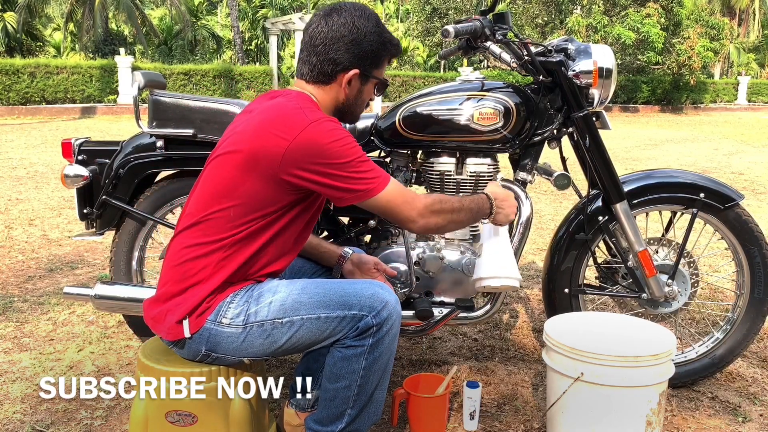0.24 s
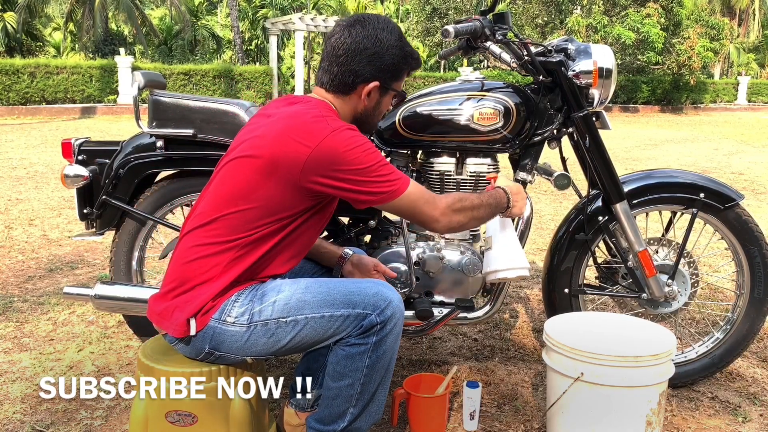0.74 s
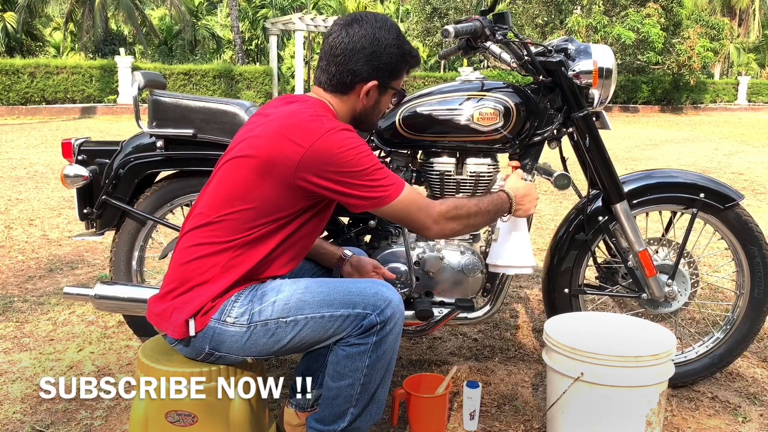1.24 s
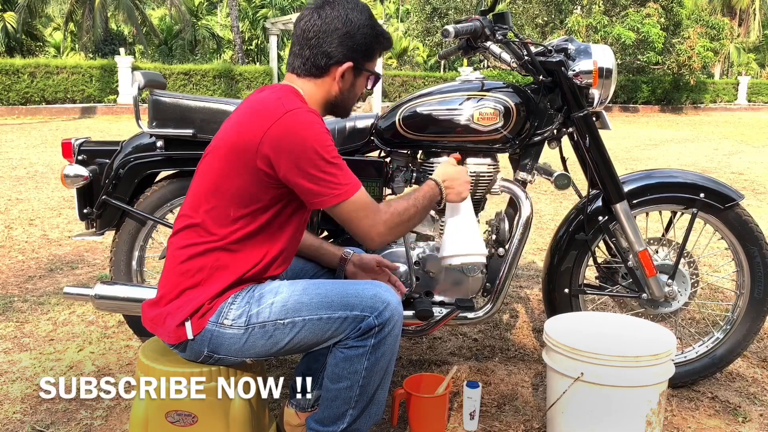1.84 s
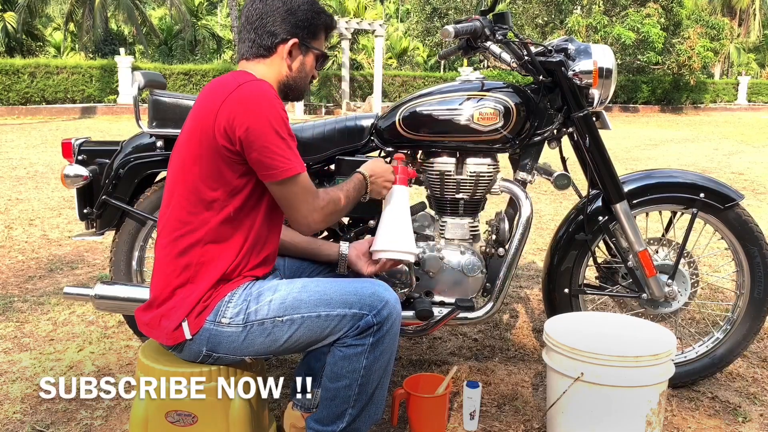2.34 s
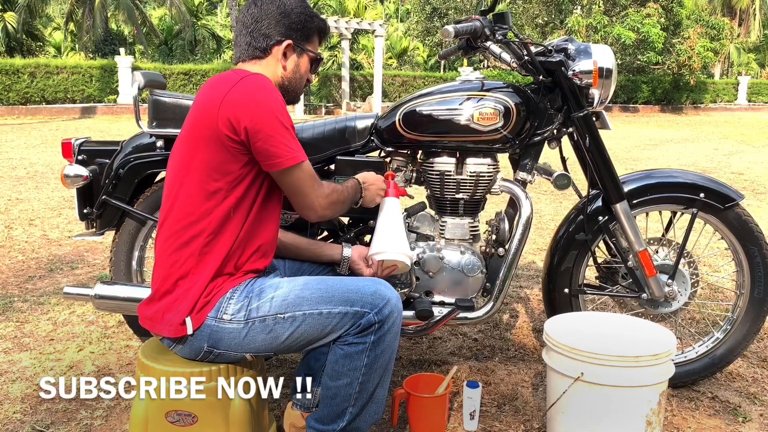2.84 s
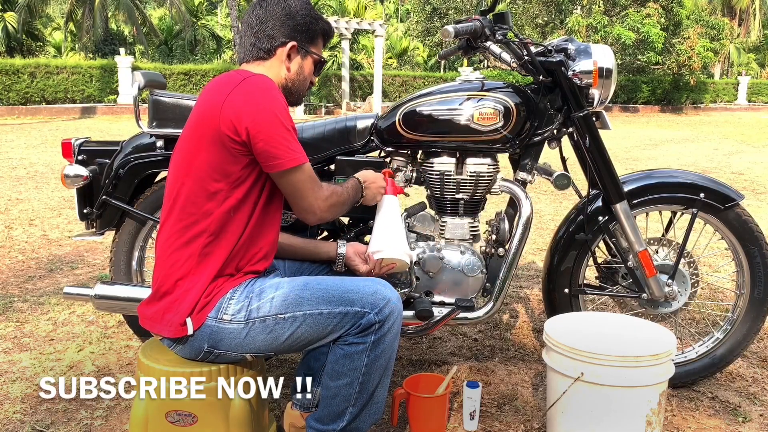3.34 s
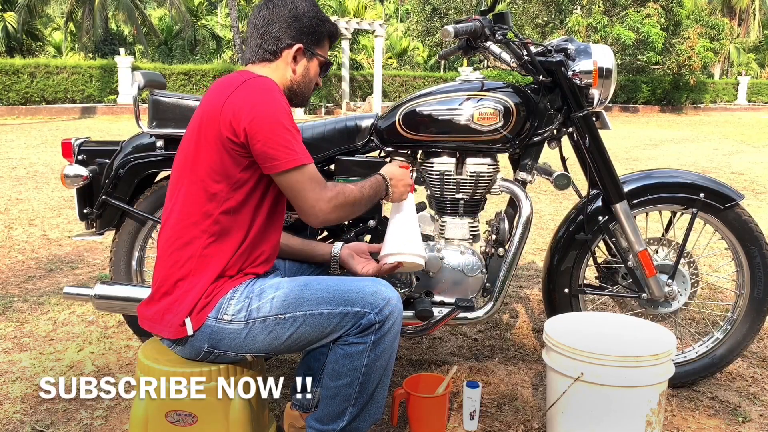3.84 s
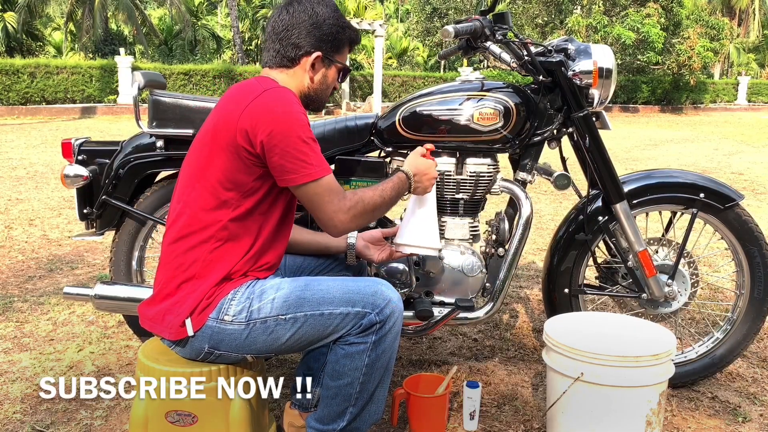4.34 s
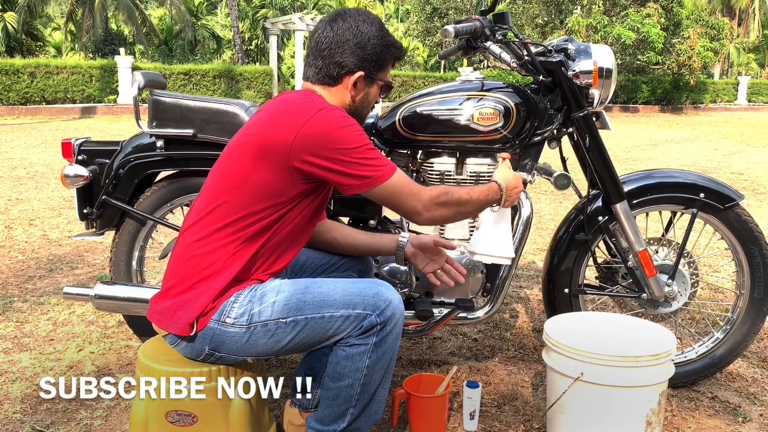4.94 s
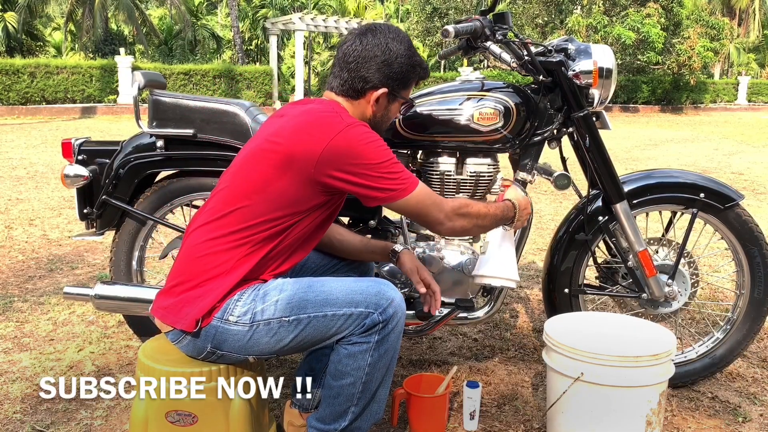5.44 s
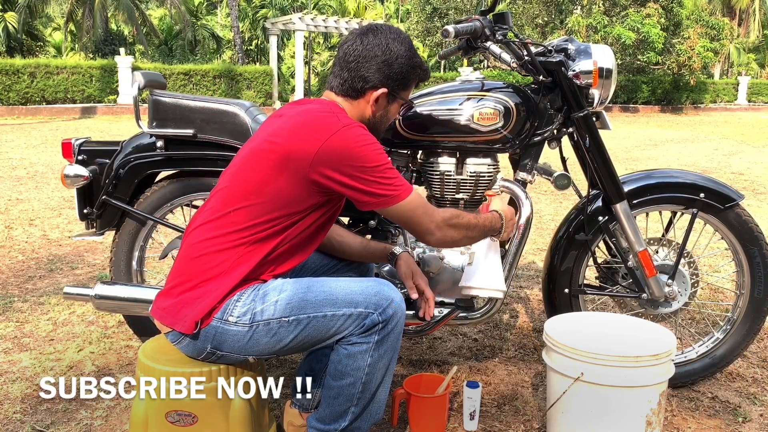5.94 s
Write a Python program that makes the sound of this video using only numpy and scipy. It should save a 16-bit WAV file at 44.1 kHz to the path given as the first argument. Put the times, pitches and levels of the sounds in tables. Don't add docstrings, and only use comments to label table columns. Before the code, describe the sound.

A hand-pump sprayer wets a motorcycle engine a few metres from a stereo outdoor microphone. Its thin, bright hiss runs throughout, mist pattering on metal, its hollow tone sliding as the hand moves. Quick pressure dips and tiny spits break the flow. Just after four seconds, low wind thumps hit the microphone and plastic lever taps click. Distant traffic and leaves stay faint behind.

```python
import sys
import numpy as np
from scipy import signal
from scipy.fft import rfft, irfft
from scipy.io import wavfile
from scipy.ndimage import uniform_filter1d, map_coordinates

SR = 44100
rng = np.random.default_rng(int(sys.argv[2]) if len(sys.argv) > 2 else 0)


def persist_wave(psi):
    counts = np.round(np.clip(psi, -1, 1) * 32767).astype(np.int16)
    wavfile.write(sys.argv[1], SR, np.atleast_2d(counts).T)


def decibels_to_gain(level_db):
    exponent = np.asarray(level_db, float) / 20
    return 10 ** exponent


N = 272538

# frequency in Hz, level in dB per Hz.
GARDEN_SPECTRUM = [(25, -31), (60, -20), (100, 1.6), (200, -8.5), (350, -12), (800, -22), (3000, -11.5),
                   (16000, -39)]
# frequency in Hz, level in dB per Hz.
BUFFET_SPECTRUM = [(15, -14), (30, -14.5), (52, -3.5), (80, -4.5), (120, -25), (180, -35.5), (300, -50)]
# centre in seconds, peak in dB, half length in seconds.
PUFFS = [(1.265, -44, .05), (1.846, -50, 0.032), (2.183, -63, 0.087), (2.45, -60, 0.077),
         (2.966, -55, 0.044), (3.505, -51, 0.044), (3.933, -38, 0.038), (4.023, -23.5, 0.019),
         (4.102, -29.5, 0.027), (4.182, -31, 0.022), (4.288, -31.5, 0.057), (4.414, -27, 0.027),
         (4.474, -34.5, 0.021), (4.522, -34.5, 0.016), (4.564, -31, 0.018), (4.632, -36, 0.031),
         (4.733, -39.5, 0.038), (4.841, -37.5, 0.042), (4.919, -33.5, 0.069), (5.128, -40, 0.073),
         (5.277, -36, .022), (5.372, -32, 0.045), (5.421, -30, .018), (5.456, -25, 0.023),
         (5.615, -34, 0.055), (5.711, -36.5, 0.017), (5.81, -46, 0.056), (6.001, -49, 0.047)]
# start in seconds, peak in dB, pitch in Hz, decay by 60 dB in seconds.
LEVER_TAPS = [
    (4.079, -20, 1330, 0.0084),
    (4.327, -18.5, 2250, 0.014),
    (4.502, -32.5, 1300, 0.022),
    (4.563, -19, 2270, 0.012),
]

# frequency in Hz, likeness from 0 to 1.
PORT_LIKENESS = [(60, .9), (250, .82), (500, .68), (1000, .72), (1500, .8), (2300, .87), (3300, .76),
                 (4200, .7), (5200, .3), (6500, .72), (8500, .92), (15000, .88)]
# frequency in Hz, left over right in dB.
PORT_TILT = [(300, 0.3), (1000, -0.8), (2200, -3.5), (4000, -5.5), (5300, -8), (6500, -2.5), (7500, 0.7)]
# frequency in Hz, phase in radians by which the left leads.
PORT_LEAD = [(0, 0), (800, -.7), (2000, 0), (5000, .05), (6500, -.6), (8550, -3.14), (11000, -6.28),
             (13400, -9.42), (15750, -12.56)]

# frequency in Hz, level in dB per Hz.
HISS_SPECTRUM = [(250, -30), (420, -16), (600, -7), (1050, -10.5), (1600, -10.5), (2600, -10), (3400, -10),
                 (4700, -10.5), (6000, -8.5), (7500, -2.5), (9200, 2), (12500, 0), (15600, -0.5)]
# time in seconds, jet pressure in dB, share of mist landing on metal in dB.
SPRAY = [(0, -29, 3.5), (.35, -27, 2.5), (.63, -25.5, 0), (.97, -29.5, 2), (1.3, -24.5, 0), (1.5, -26.5, 1),
         (1.75, -27, 0), (2.03, -23.5, -1.5), (2.3, -25, -1.5), (2.57, -24, -1.5), (2.95, -25.5, -1.5),
         (3.45, -24.5, 0), (3.72, -27, -.5), (3.84, -26, -0.5), (4.3, -26, -1), (4.7, -27, 0),
         (5.2, -28.5, 1.5), (6.18, -29, 2.5)]
# return of pressure in seconds, depth in dB, time held low in seconds,
# recovery in seconds.
STROKES = [(.45, 2.5, 0.064, 0.058), (.95, 2, 0.021, .01), (1.4, 0, 0.078, 0.0093),
           (1.658, 5.2, .028, 0.0064), (1.729, 4, 0.019, 0.0039), (1.993, 3.5, 0.026, .0012),
           (2.15, 1, 0.014, 0.015), (2.31, 3, 0.03, .003), (2.64, 2, 0.051, 0.013),
           (2.869, 5, 0.041, 0.032), (3.62, 4, 0.022, 0.015), (3.72, 2, 0.086, 0.0083),
           (3.991, 5.5, .12, 0.0014), (3.991, 6, 0.049, .0012), (3.992, 9.5, 0.016, 0.0017),
           (4.049, 3, 0.06, 0.017), (4.505, 7, 0.027, 0.012), (4.72, 0.5, .03, .03), (4.925, 3, .02, .03),
           (5.042, 6.5, 0.036, 0.01), (5.6, 2.5, 0.013, 0.036), (5.677, 5.5, 0.028, 0.0056)]
# time in seconds, level in dB.
SPITS = [
    (1.666, 3.5),
    (1.993, 8),
    (2.314, 2),
    (3.993, 4),
]
# centre in Hz, lag behind the pressure from 0 to 1,
# how far it follows the mist on metal (factor), extra sag in a stroke (factor).
SPLASH = [
    (740, 0.3, 0.39, 0.25),
    (1690, 1, 0.94, 0.3),
    (3900, 0.1, 0.36, .15),
]
# time in seconds, factor that shortens most echoes.
NEARNESS = [(0, 0.79), (.5, 0.98), (1.2, 0.96), (1.6, 0.89), (2.0, 1.02), (2.5, 1.14), (2.85, 1.26),
            (3.2, 1.1), (3.5, 1.24), (3.85, 1.11), (4.3, 1), (4.6, 1.06), (5.2, 1.32), (5.6, 1.29),
            (6.18, 1.31)]
# delay in ms, level in dB, exponent by which nearness shortens the delay.
ECHOES = [
    (0.451, -26.5, 2.5),
    (.9, -7.5, 2.5),
    (1.348, -13, 1.73),
    (1.901, -12.5, 1.33),
    (2.602, -15.5, 3),
    (3.301, -19.5, -1.9),
]
# time in seconds, null in Hz, depth in dB.
GROUND_NULL = [(0, 1200, -13), (1.5, 900, -5), (2.0, 855, -16), (2.8, 980, -9.5), (3.6, 1030, -14.5),
               (4.2, 784, -3.5), (5.0, 1050, -9), (6.18, 1170, -3.5)]
# start in seconds, length in seconds, first pitch in Hz, last pitch in Hz, level in dB.
FIN_GAPS = [(0, 0.29, 2300, 1950, 10.5), (.5, 0.3, 1540, 1480, 13.5), (.86, 0.76, 1930, 1845, 11.5),
            (1.7, 0.22, 2430, 2480, 11.5), (1.8, 0.56, 1660, 1746, 13.5), (2.55, 0.75, 1370, 1250, 11),
            (2.4, 1.36, 2260, 2320, 6), (3.6, 0.38, 1960, 1770, 12.5), (4.02, 0.41, 1766, 1750, 14),
            (4.65, 0.39, 1180, 1310, 12), (4.7, .6, 1890, 2190, 6.5), (5.1, 0.32, 1390, 1540, 14),
            (5.5, 0.67, 1566, 1464, 9.5), (0, 0.34, 2980, 3080, 6),
            (0, 0.13, 6300, 6300, 12), (.25, 0.63, 3510, 3400, 9), (.95, 0.61, 3370, 3240, 11.6),
               (1.02, 0.38, 7540, 7400, 9.4), (1.35, 0.21, 4950, 5000, 13), (1.82, 0.11, 3200, 3300, 16),
               (2.02, 0.46, 5840, 6400, 8.3), (2.2, 0.55, 3040, 3280, 7.6), (2.4, 0.091, 3650, 4100, 16),
               (2.45, 0.47, 6370, 7300, 7.8), (2.9, 0.58, 7120, 6150, 8), (2.65, 0.55, 4240, 4370, 11),
               (2.7, .7, 3460, 3370, 8.2), (3.45, 0.31, 6030, 5580, 12), (3.65, 0.18, 3320, 3320, 12),
               (4.02, 0.15, 5740, 6200, 14.4), (5.02, 0.15, 5250, 5700, 9.9), (.9, 0.18, 3870, 3940, 9.6),
               (5.15, 0.59, 4100, 4360, 4.3)]
# start in seconds,
# length in seconds, first frequency in Hz, last frequency in Hz, level in dB.
TANK_NULLS = [(0, 0.16, 3880, 3750, -6), (.28, 0.7, 4500, 4950, -6.5), (.31, .28, 2900, 2860, -6),
              (.82, 0.94, 2310, 2240, -4), (1.36, 0.7, 5300, 4860, -7), (1.96, .84, 3160, 5550, -7.5),
              (2.22, 1.83, 2740, 2600, -5.5), (2.76, 0.69, 3100, 3000, -4.5), (2.72, 0.68, 4710, 4660, -5),
              (3.21, .68, 5300, 4450, -5), (3.31, 0.26, 4250, 3520, -4), (3.52, 0.36, 1170, 1140, -7),
              (4.58, 0.61, 2600, 3430, -8), (4.91, 0.3, 3350, 4080, -11), (5.02, .68, 1660, 2040, -5.5),
              (5.22, 0.77, 4700, 4840, -5), (5.31, .73, 3910, 3990, -5), (5.32, .78, 3460, 3540, -4.5)]

BREEZE_DB, BREEZE_SWING_DB = -61, 2.5
THUMP_HZ, THUMP_SPREAD = 55, 0.13
THUMP_SHARE = 0.52
THUMP_KINK, THUMP_SIDE_DB = 0.11, -7
EDGE_SHARE, SPIT_S = 0.13, 0.0012
DWELL_FADE_S, GROUND_WIDTH_HZ = 0.06, 123
GAP_WIDTH_HZ, WIDTH_GROWS = 95, 0.3
NULL_WIDER, ECHO_SHARE = 1.4, 0.82


def unit(x):
    return x / np.sqrt(np.mean(np.abs(x) ** 2) + 1e-20)


def along(points, hz):
    f, v = np.transpose(points)
    return np.interp(np.log(hz + 1), np.log(f + 1), v)


def curves(rows, t):
    s, *cols = np.transpose(rows)
    return [np.interp(t, s, c) for c in cols]


def drift(t, rate):
    return map_coordinates(rng.standard_normal(N // 64), [t * rate])


def patches(shape, bins, frames):
    field = uniform_filter1d(rng.standard_normal(shape), bins, axis=0)
    return unit(uniform_filter1d(field, frames, axis=1))


def ports(response, size=1024):
    hz, t, z = signal.stft(rng.standard_normal((2, N)), SR, nperseg=size)
    turn = np.arccos(np.clip(along(PORT_LIKENESS, hz), -1, 1))[:, None] / 2
    mid, side = z[0] * np.cos(turn), z[1] * np.sin(turn)
    lead = np.interp(hz, *np.transpose(PORT_LEAD))[:, None]
    lead = lead * (1 + 0.022 * drift(t, 9))
    left = decibels_to_gain(along(PORT_TILT, hz) / 2)[:, None] * np.exp(0.5j * lead)
    pair = np.array([(mid + side) * left, (mid - side) / left])
    return unit(signal.istft(pair * response(hz[:, None], t), SR, nperseg=size)[1][:, :N])


def garden():
    return decibels_to_gain(-53.5) * ports(lambda hz, t: decibels_to_gain(along(GARDEN_SPECTRUM, hz)), size=4096)


def wind():
    step = 16
    t = np.arange(0, N, step) / SR
    shapes = [decibels_to_gain(db) * np.exp(-((t - s) / half) ** 2) for s, db, half in PUFFS]
    luck = rng.standard_normal((len(PUFFS), 3))
    thumps = np.zeros((2, len(t)))
    for shape, (s, db, half), (pitch, phase, side) in zip(shapes, PUFFS, luck):
        angle = 2 * np.pi * THUMP_HZ * np.exp(THUMP_SPREAD * pitch) * (t - s) + 2 * phase
        rocking = np.cos(angle) + THUMP_KINK * np.cos(2 * angle + phase)
        skew = decibels_to_gain(THUMP_SIDE_DB) * np.tanh(2 * side) * np.sin(angle)
        thumps += np.sqrt(2) * shape * (rocking + np.array([skew, -skew]))
    breeze = decibels_to_gain(BREEZE_DB + BREEZE_SWING_DB * drift(t, 8.2))
    strength = breeze + np.sqrt(1 - THUMP_SHARE) * sum(shapes)
    slow = signal.resample_poly([*thumps, strength], step, 1, axis=1, padtype="edge")[:, :N]
    loose = ports(lambda hz, t: decibels_to_gain(along(BUFFET_SPECTRUM, hz)), size=8192)
    return np.sqrt(THUMP_SHARE) * slow[:2] + slow[2] * loose


def lever():
    out = np.zeros(N + SR)
    t = np.arange(SR // 20) / SR
    for s, db, hz, t60 in LEVER_TAPS:
        angle = 2 * np.pi * hz * t
        ring = np.sin(angle) + 0.2 * np.sin(0.325 * angle) + 0.41 * np.sin(1.75 * angle)
        onset = 1 - np.exp(-t / 0.0024)
        out[round(s * SR):][:len(t)] += decibels_to_gain(db + 9.5 - 60 * t / t60) * onset * ring
    return out[:N]


def sag(t):
    lost = 0
    for s, depth, held, back in STROKES:
        fall = 0.5 + 0.5 * np.tanh((t - s + held) / (EDGE_SHARE * held))
        recovery = np.exp(-np.abs(t - s) / back)
        lost = lost + depth * np.where(t < s, fall, recovery)
    return lost - sum(db * np.exp(-((t - s) / SPIT_S) ** 2) for s, db in SPITS)


def dwells(rows, hz, t, wider=1):
    total = np.zeros((len(hz), len(t)))
    for s, length, first_hz, last_hz, db in rows:
        gate = 0.5 * (np.tanh((t - s) / DWELL_FADE_S) - np.tanh((t - s - length) / DWELL_FADE_S))
        on = gate > 0.01
        centre = np.interp(t[on], [s, s + length], [first_hz, last_hz])
        width = wider * GAP_WIDTH_HZ * (centre / 2000) ** WIDTH_GROWS
        total[:, on] += db * gate[on] / (1 + ((hz - centre) / width) ** 2)
    return total


def splash(hz, t):
    jet, metal = curves(SPRAY, t)
    total = 0
    for centre, lag, aim, extra in SPLASH:
        db = aim * metal - lag * jet - extra * sag(t) + 0.96 * drift(t, 14)
        total = total + (db - db.mean()) * np.exp(-(np.log((hz + 1) / centre) / 0.53) ** 2)
    return total


def echoes(hz, t):
    near, = curves(NEARNESS, t)
    small = 1 / (1 + (5500 / (hz + 1)) ** 4)
    total = 0
    for ms, db, pull in ECHOES:
        wobble = 1 + 0.02 * drift(t, 4) + 0.0065 * drift(t, 25)
        delay_s = ms / 1000 / near ** pull * wobble
        total = total + decibels_to_gain(db) * np.exp(-2j * np.pi * hz * delay_s)
    return 1 + ECHO_SHARE * small * total


def engine_colour(hz, t):
    null_hz, null_db = curves(GROUND_NULL, t)
    ground_db = null_db / (1 + ((hz - null_hz) / GROUND_WIDTH_HZ) ** 2)
    fins_db = dwells(FIN_GAPS, hz, t)
    tank_db = dwells(TANK_NULLS, hz, t, NULL_WIDER)
    comb = echoes(hz, t)
    field_db = 1.34 * patches(comb.shape, 12, 5) + 2.0 * patches(comb.shape, 3, 7)
    return decibels_to_gain(along(HISS_SPECTRUM, hz) + splash(hz, t) + fins_db + tank_db + ground_db + field_db) * comb


def sprayer():
    t = np.arange(0, N, 8) / SR
    sputter_db = 0.89 * drift(t, 9.1) + 0.36 * drift(t, 45) + 0.31 * drift(t, 180) + 1.0 * drift(t, 600)
    jet = decibels_to_gain(curves(SPRAY, t)[0] + 5 - sag(t) + sputter_db)
    return np.interp(np.arange(N) / SR, t, jet) * ports(engine_colour)


def scene():
    return garden() + wind() + lever() + sprayer()


def low_pass(x):
    return signal.sosfilt(signal.butter(12, 17100, fs=SR, output="sos"), x)


def record(dry):
    passed = np.fft.rfftfreq(N, 1 / SR) < 15800
    mix = irfft(rfft(dry) * passed, N)
    return low_pass(mix)


dry = scene()
out = record(dry)
persist_wave(out)
```